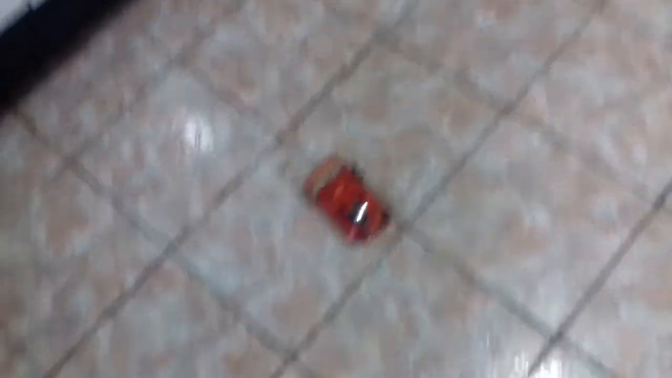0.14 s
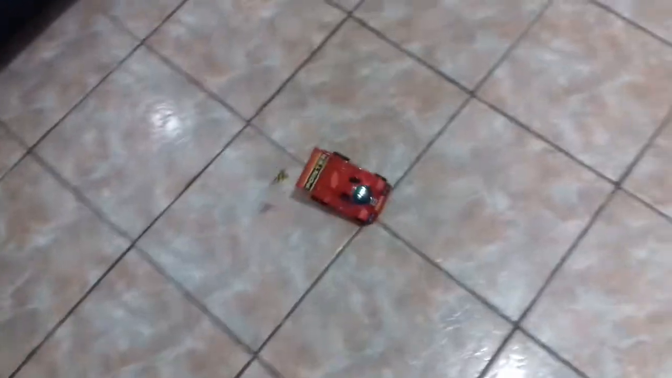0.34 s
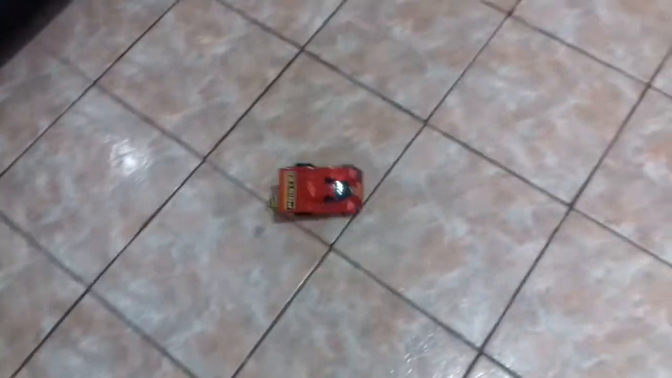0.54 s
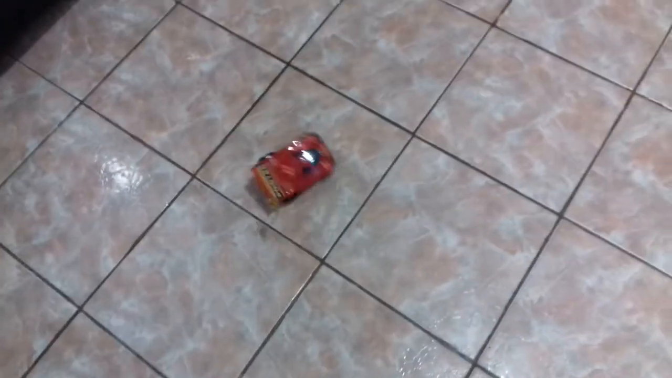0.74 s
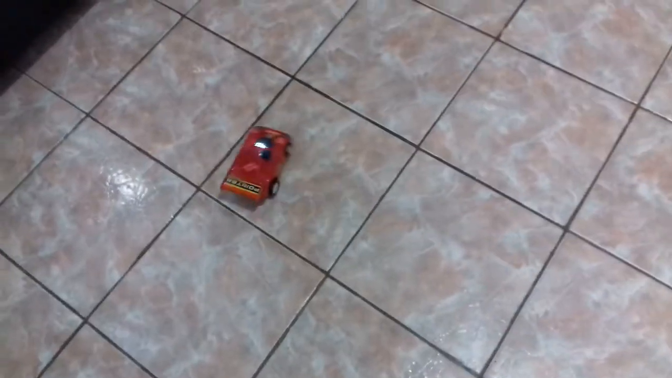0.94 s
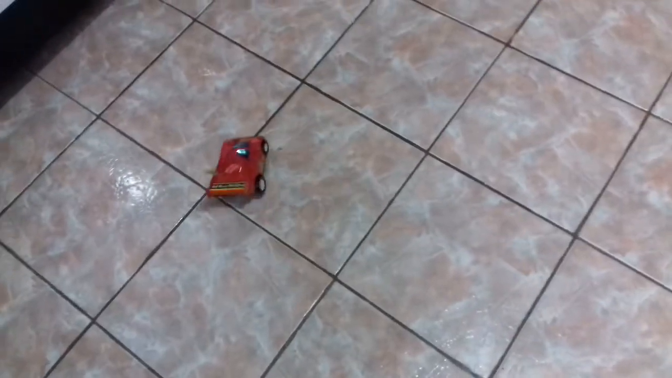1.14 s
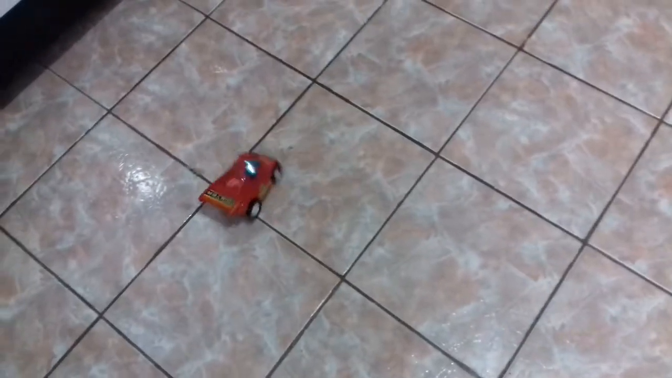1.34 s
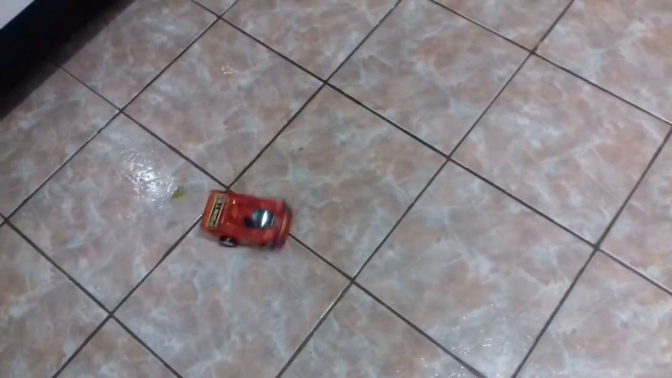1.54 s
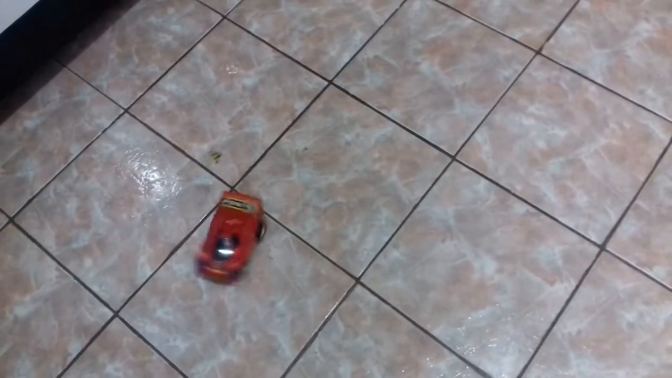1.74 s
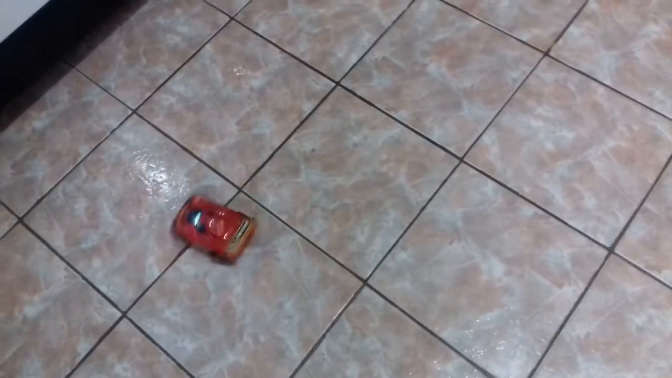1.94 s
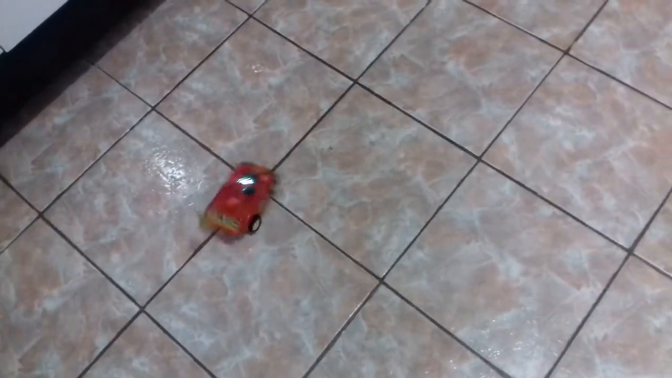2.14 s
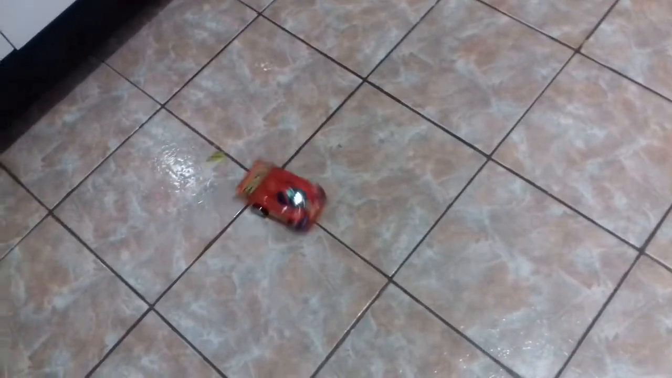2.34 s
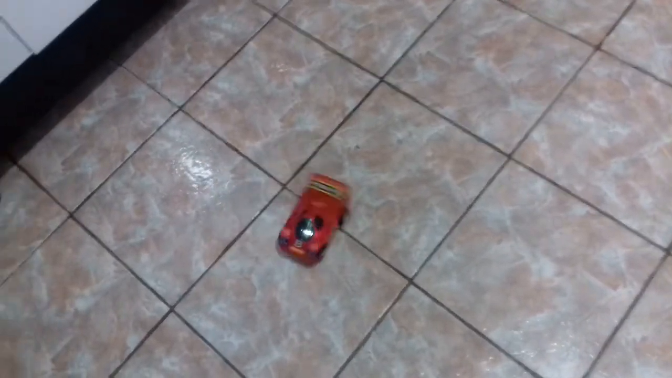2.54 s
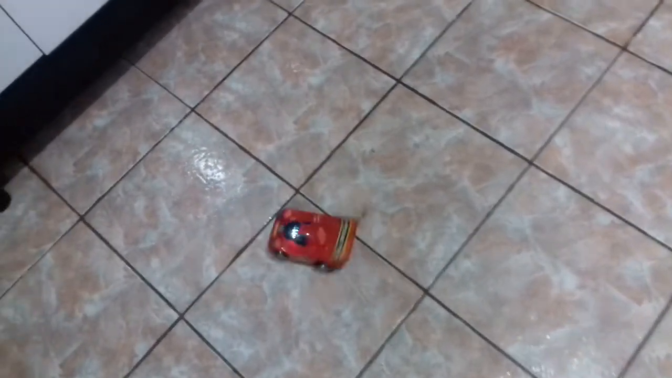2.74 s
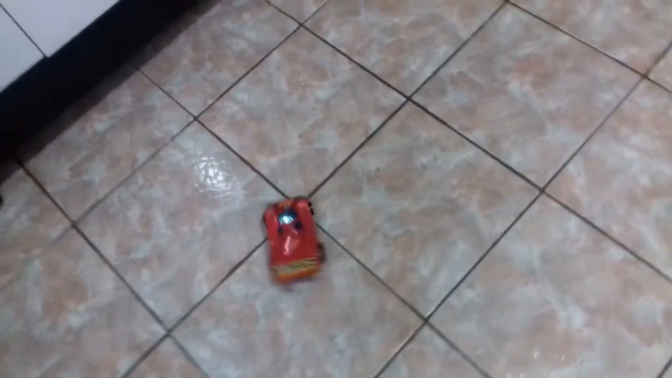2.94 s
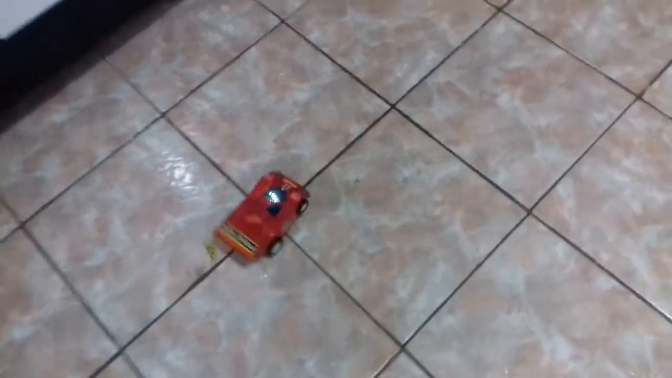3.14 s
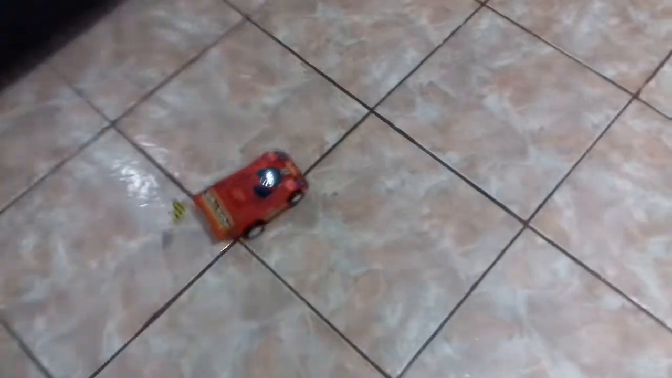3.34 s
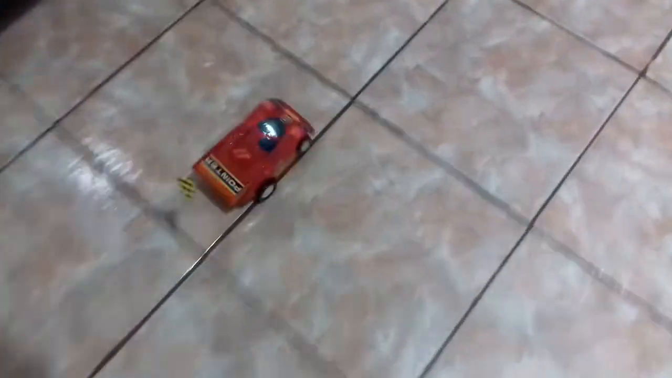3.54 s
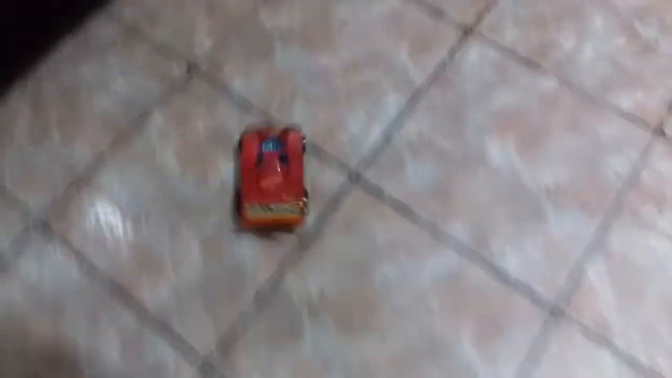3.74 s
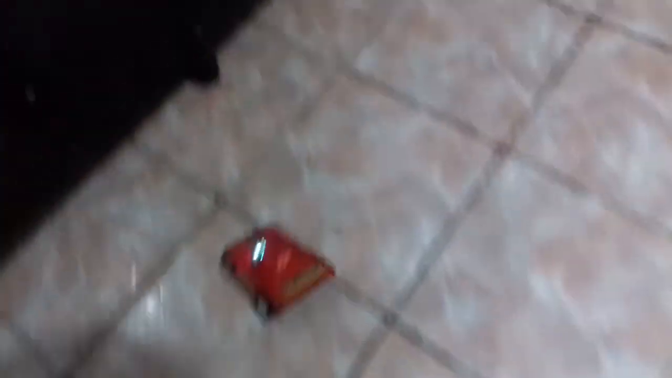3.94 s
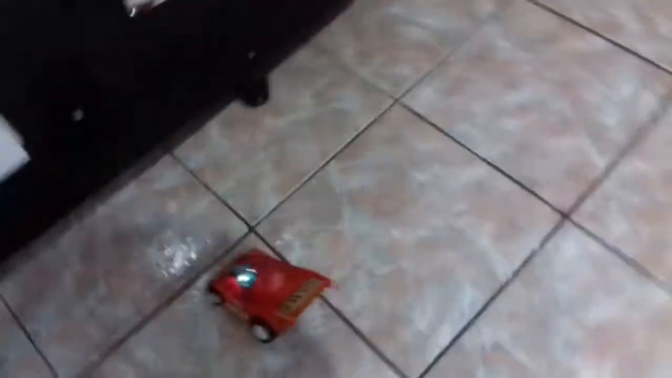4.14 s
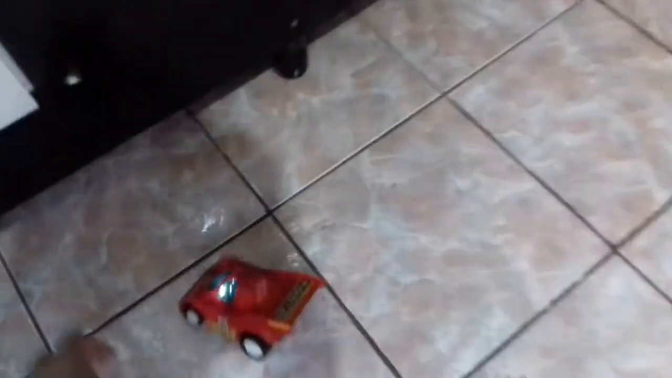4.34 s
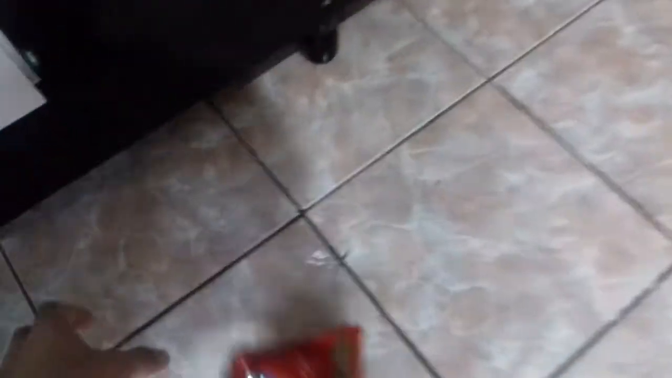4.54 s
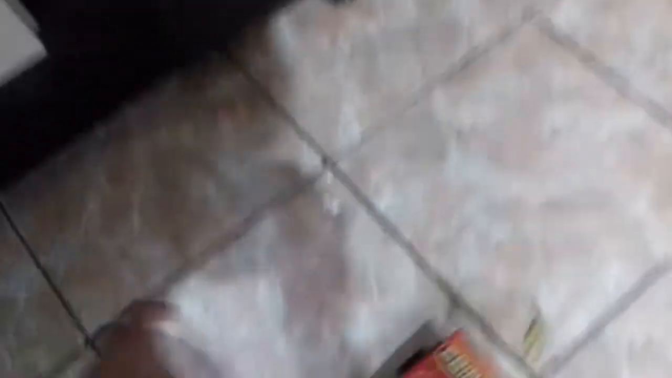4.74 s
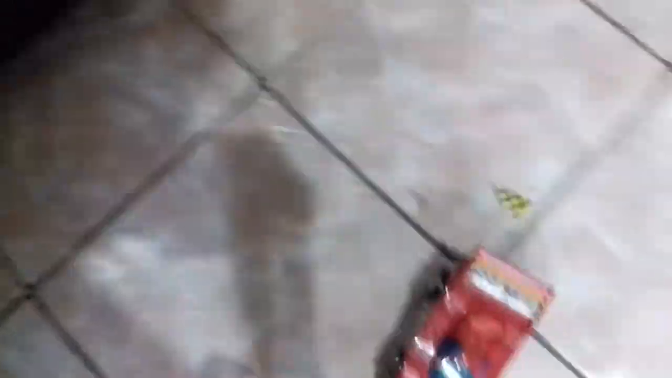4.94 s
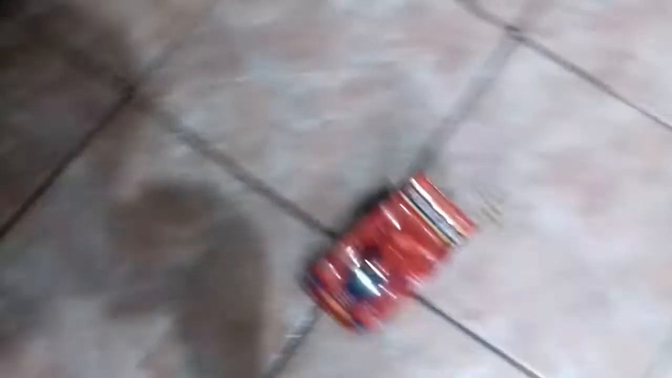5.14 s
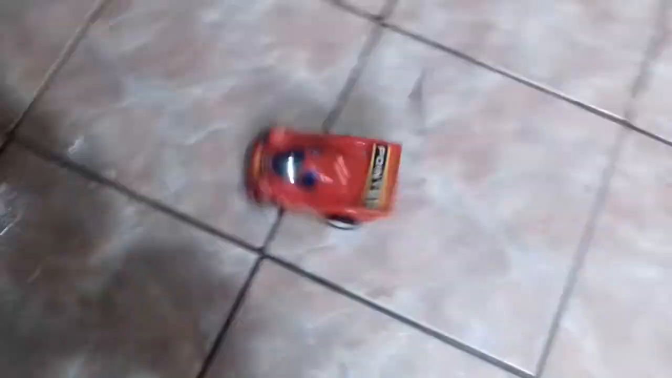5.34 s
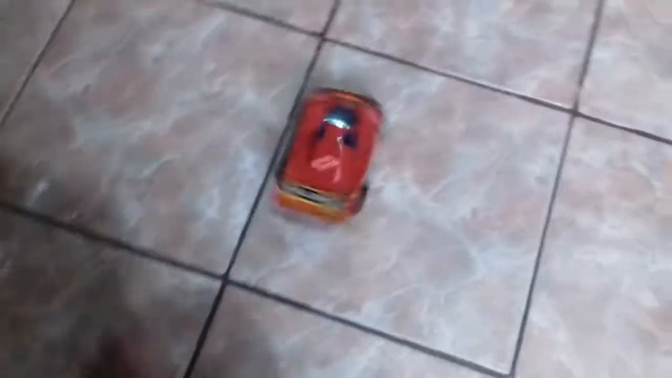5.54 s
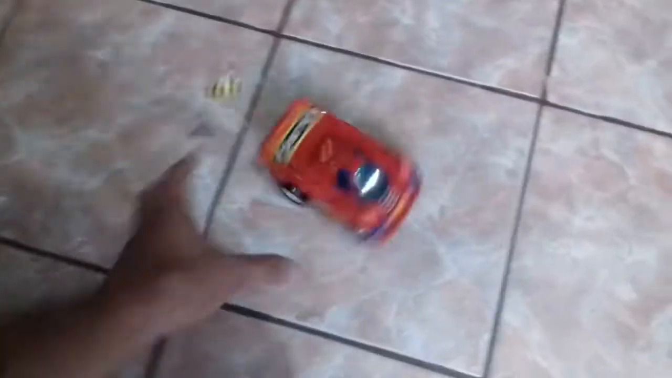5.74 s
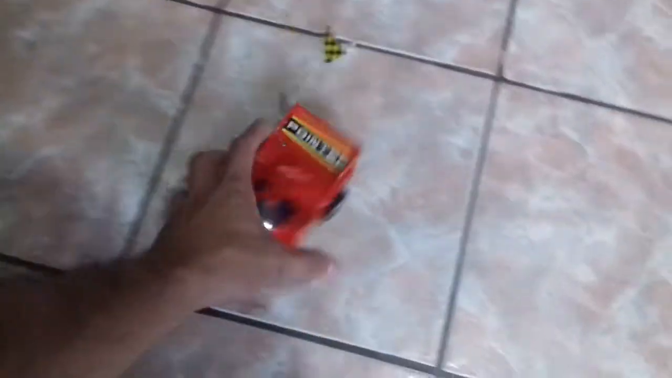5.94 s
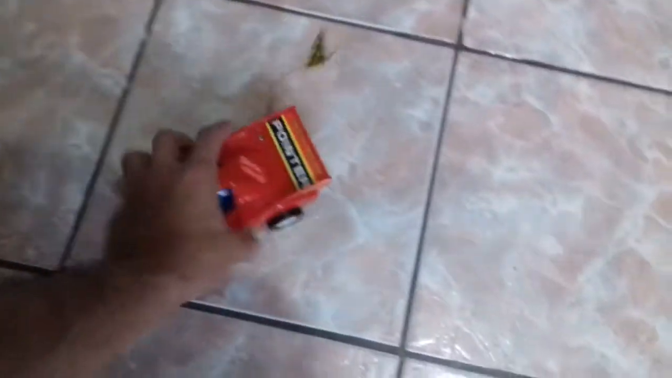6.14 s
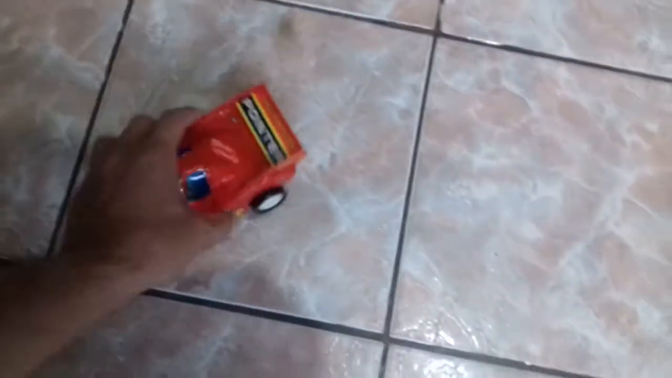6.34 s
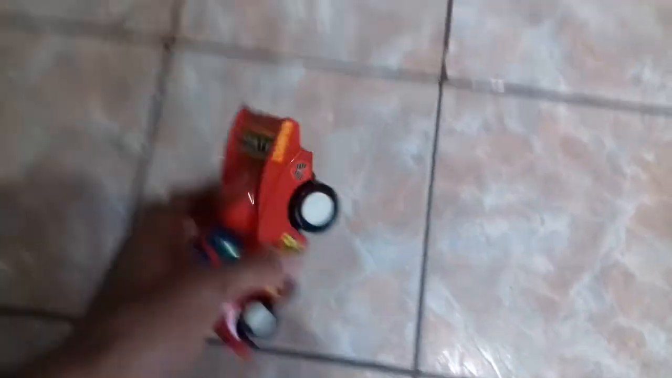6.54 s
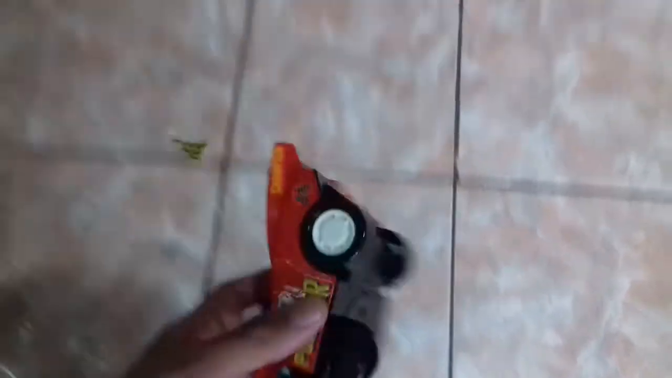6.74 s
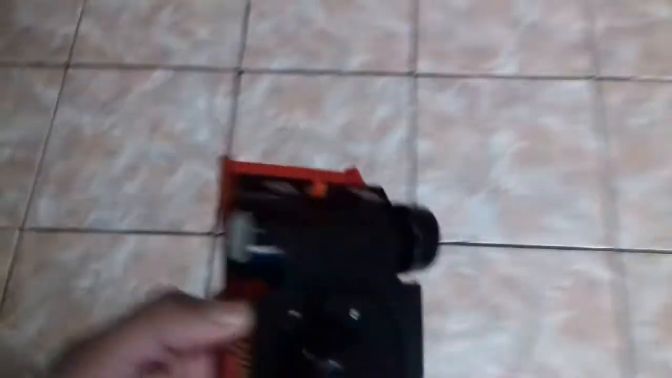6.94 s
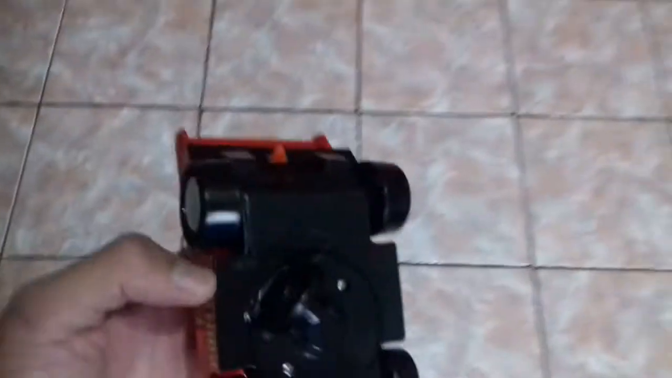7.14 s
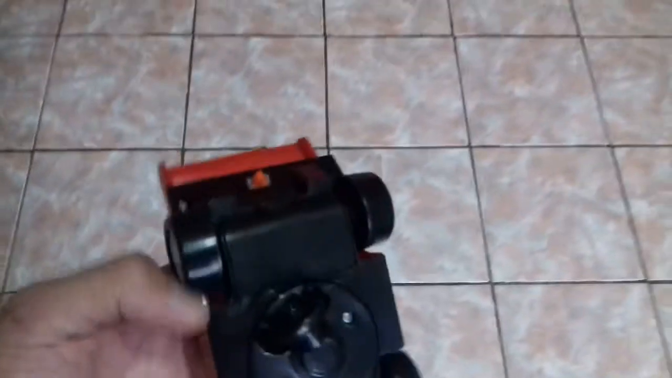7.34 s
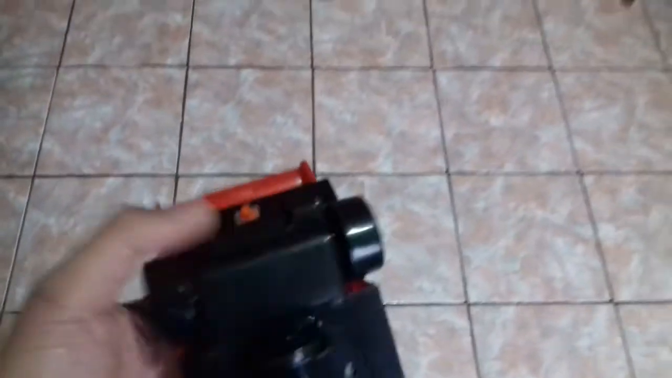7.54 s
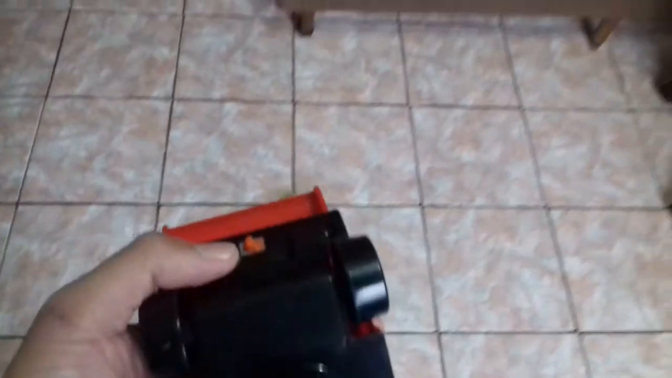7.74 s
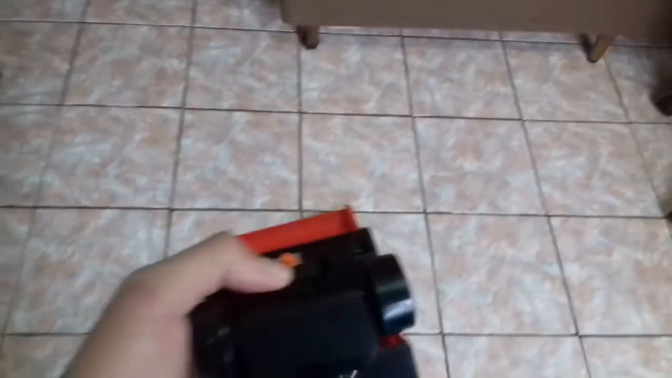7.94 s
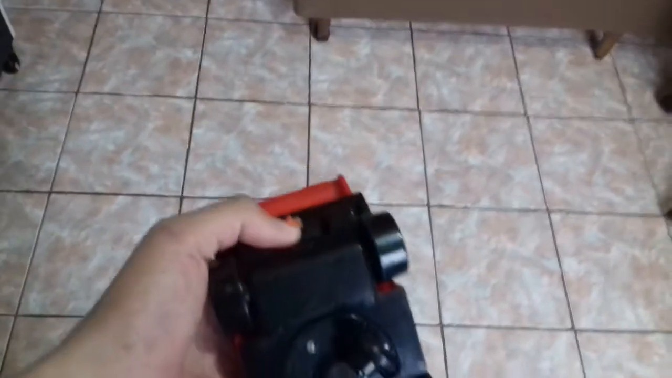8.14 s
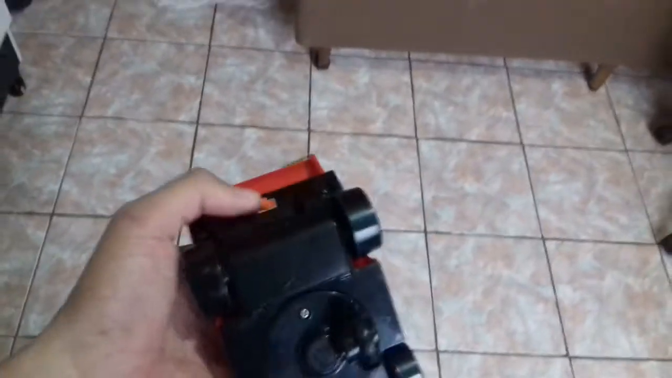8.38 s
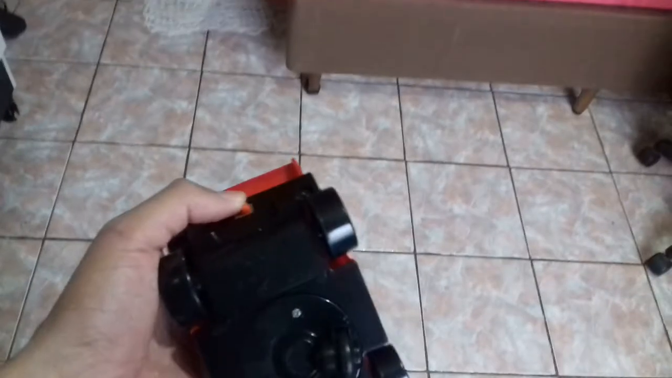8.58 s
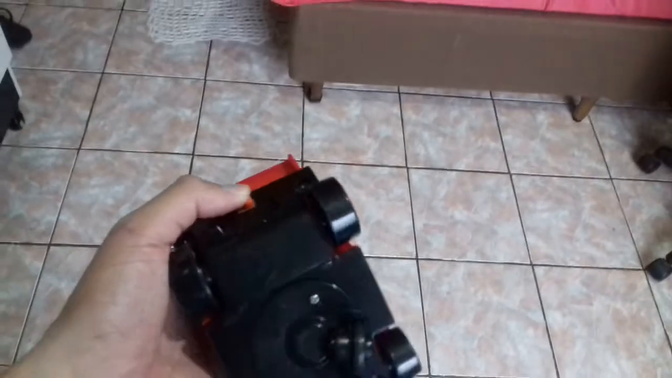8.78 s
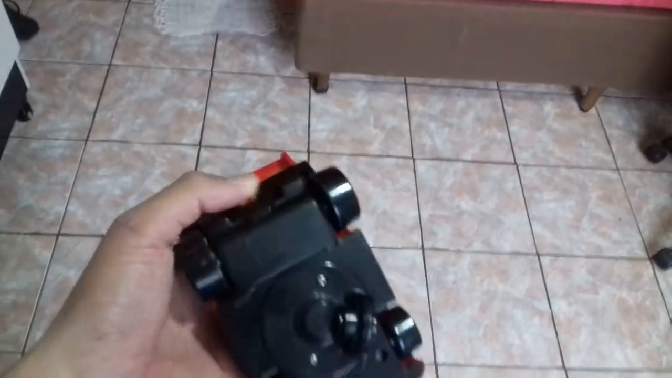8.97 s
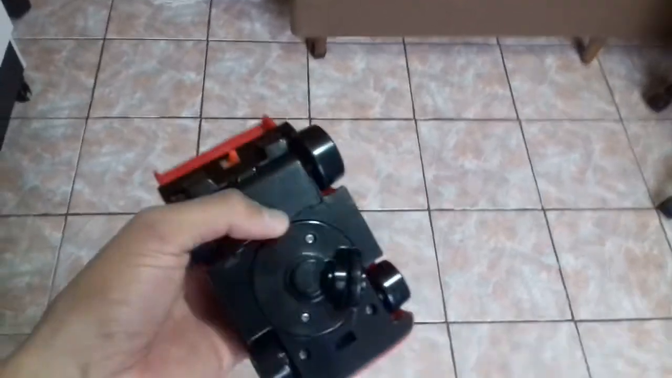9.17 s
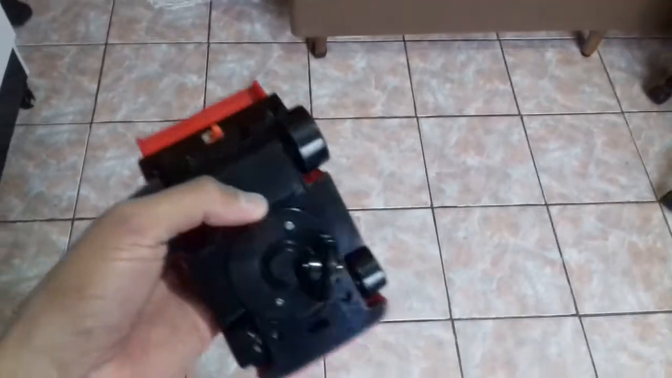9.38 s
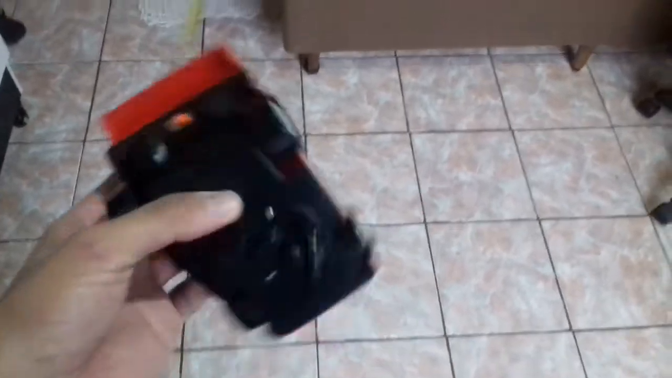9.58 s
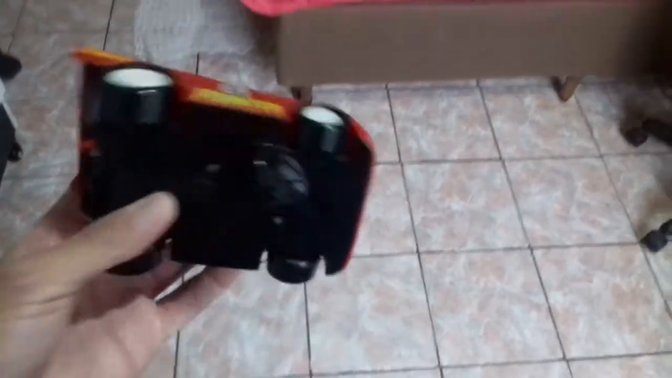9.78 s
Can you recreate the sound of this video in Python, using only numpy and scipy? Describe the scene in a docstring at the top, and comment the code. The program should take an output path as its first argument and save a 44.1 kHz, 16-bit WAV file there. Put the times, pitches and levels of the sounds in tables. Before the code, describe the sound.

Close handheld capture of a cheap battery toy car spinning on floor tiles: dense, bright, raspy gear noise with a thin whine, wavering as it turns, and irregular plastic rattles. Two hard knocks come around the middle. Picked up, it whirs steadily with a purer motor tone, then clicks off and winds down within half a second, leaving faint room hum and small handling clicks.

```python
"""In a quiet room with faint hums, a toy car spins over a tiled floor close by; a hand then lifts it.
Taps of its gear teeth ring through the plastic body, and tones at multiples of the shaft speed whine.
In the hand the shaft tone comes clear; switched off, the motor runs down.
Filtered noise makes the room air, the low thumps, the plastic's knocks and clicks, and a rustle.
Sparse echoes of the car come off hard tiles and walls."""
import sys
import numpy as np
from scipy import signal
from scipy.fft import rfft, irfft
from scipy.io import wavfile
from scipy.ndimage import uniform_filter1d, minimum_filter1d

SR = 44100
rng = np.random.default_rng(int(sys.argv[2]) if len(sys.argv) > 2 else 0)


def store_wav(level_fs):
    """Save 16-bit WAV to argv[1]."""
    pcm = np.round(np.clip(np.atleast_2d(level_fs), -1, 1) * 32767)
    wavfile.write(sys.argv[1], SR, pcm.T.astype(np.int16))


N = 432621  # length in samples

# The motor sags under load on the floor and runs free in the hand.
# Columns: time_s, shaft_speed_hz (turns per second), low_tones_db (before each tone's own level)
SHAFT = [(0, 204, -80.5), (.5, 198.4, -72), (.88, 195.3, -62), (.93, 213.7, -68), (1.149, 223.8, -70),
         (1.78, 214.7, -77), (1.9, 226.3, -72), (3.1, 220.2, -61), (3.8, 210, -64), (4.55, 192.5, -67),
         (4.77, 190.6, -58), (4.999, 222.6, -61.5), (6.3, 221, -68.5), (6.45, 242.4, -62),
         (6.78, 250, -51.5), (6.86, 250.8, -38), (7.1, 253.4, -39), (7.17, 249.9, -52.5), (7.7, 246, -50.5),
         (8.05, 247, -49), (8.6, 245, -51), (8.72, 238.3, -68), (9.1, 147, -88)]
# Wheels jolt over tile joints.
# Columns: start_s, treble_peak_db (sets the strength, up to a cap), thump_db
JOLTS = [(0.918, -10, -60), (0.986, -11.5, -56.5), (1.086, -23, -54), (1.5305, -22.5, -52),
         (1.5594, -11.5, -64), (1.6429, -28.5, -59), (2.0034, -11, -59), (2.0637, -14.5, -65),
         (2.2381, -7, -64), (2.52, -13.5, -65), (2.7524, -20, -45), (3.3021, -13.5, -56),
         (3.7725, -18.5, -62), (4.794, -7, -53), (4.857, -14.5, -53), (4.906, -8.5, -53),
         (4.9608, -12.5, -63), (5.0024, -19.5, -57), (5.2639, -7.5, -52), (5.3282, -19.5, -51),
         (5.917, -18.5, -64)]
# The plastic knocks on hard landings and clicks in the hand.
# Columns: start_s, peak_db (before echoes), main_pitch_hz, thump_db
CLICKS = [(0.919, -10, 3460, -47), (4.795, -2.5, 1820, -48), (5.329, -2, 1840, -62), (8.67, -12, 3782, -57),
          (9.104, -46, 3540, -53), (9.153, -46.5, 1960, -50), (9.303, -43, 3830, -56),
          (9.613, -33, 2510, -60), (9.636, -31.5, 1120, -71), (9.653, -32, 4250, -71),
          (9.712, -30, 2440, -66), (9.741, -40, 2010, -68), (9.764, -21.5, 4030, -68),
          (9.783, -42, 4080, -67), (9.798, -40, 4220, -64)]
# Ringing pitches of the plastic body. Columns: pitch_hz, width_hz (of one filter pass), level_db
PLASTIC = [(1105, 400, -3.5), (1800, 570, -1.5), (2400, 480, -5.5), (2870, 530, -2), (3700, 400, -6.5),
           (4080, 740, -3)]

USUAL_TURNS_HZ = 225.6  # usual shaft speed
LIFT_S, OFF_S, STILL_S = 6.38, 8.72, 9.21  # lifted, switched off, at rest


def gain_of(db):
    """Turn decibels into a plain multiplier."""
    return 10 ** (np.asarray(db) / 20)


def evened(x):
    """Scale a sound to an average strength (rms) of 1."""
    return x / np.sqrt(np.mean(x ** 2) + 1e-20)


def read(points, hz):
    """Read levels off a curve of pitch and dB, on a logarithmic pitch scale."""
    pitch_hz, level_db = np.transpose(points)
    return np.interp(np.log(hz + 1), np.log(pitch_hz + 1), level_db, left=-99, right=-99)


def add(mix, start_s, sound):
    """Mix a sound in at a given time, cutting it at the end of the scene."""
    part = mix[round(start_s * SR):][:len(sound)]
    part += sound[:len(part)]


def coloured(points):
    """Steady noise whose spectrum follows a curve, rms 1."""
    hz = np.fft.rfftfreq(N, 1 / SR)
    spectrum = rfft(rng.standard_normal(N))
    return evened(irfft(spectrum * gain_of(read(points, hz)), N))


def wander(shape, sizes):
    """Smooth random change of rms 1: noise averaged twice along each axis."""
    x = rng.standard_normal(shape)
    for axis, size in enumerate(sizes):
        x = uniform_filter1d(uniform_filter1d(x, size, axis), size, axis)
    return evened(x)


def ring(x, hz, width):
    """A fixed resonance: it passes its own pitch at gain 1 and weakens the rest."""
    return signal.lfilter(*signal.iirpeak(hz, hz / width, SR), x)


def by_place(pair, t):
    """Use the first value on the floor and the second in the hand, with a quick glide between."""
    return np.interp(t, [LIFT_S - .02, LIFT_S + .02], pair)


def run_down_db(t):
    """Fading of the motor after the switch: it coasts, then stops quickly."""
    share = np.clip((t - OFF_S) / (STILL_S - OFF_S), 0, 1)
    return 20 * 2.27 * np.log10(np.maximum(1 - share ** 1.45, 1e-4))


def jolt_strength(peak_db):
    """Strength of a jolt against the usual treble peaks of the whir, capped."""
    usual_peak_db = -13
    return min(gain_of(peak_db - usual_peak_db), 2.2)


def background():
    """Quiet room air as steady coloured noise, and faint hums that waver in level and phase."""
    # Spectrum of the air, before its overall level. Columns: pitch_hz, level_db (per Hz)
    air = [(15, -40), (25, -19), (45, -18), (75, -26), (152, -17), (227, -18), (305, -16), (421, -23),
           (1850, -28), (2230, -22), (3340, -31), (4040, -23), (5880, -45), (15500, -51)]
    # Hums. Columns: pitch_hz, level_db
    hum_tones = [(301.5, -68), (45, -82)]
    t = np.arange(N) / SR
    hum = np.zeros(N)
    for hz, db in hum_tones:
        level = gain_of(db + 2.5 * wander((N,), (3000,)))
        hum += level * np.sin(2 * np.pi * hz * t + .9 * wander((N,), (3500,)))
    return gain_of(-62.5) * coloured(air) + hum


def side_hiss():
    """Faint low noise, to be added on the left and subtracted on the right."""
    # Spectrum of the hiss, before its overall level. Columns: pitch_hz, level_db (per Hz)
    hiss = [(25, -7.5), (80, -3.5), (250, -14.5), (600, -23)]
    return gain_of(-87) * coloured(hiss)


def thump(db, rise_s):
    """A short low push of filtered noise that swells and dies; db is the level at its height."""
    u = np.arange(3000) / SR / rise_s
    band = signal.butter(2, [150, 560], "band", fs=SR, output="sos")
    low = signal.sosfilt(band, rng.standard_normal(2 * len(u)))[len(u):]  # skip the filter's start
    shape = u * np.exp(1 - u)
    return gain_of(db) * low * shape / np.sqrt((low ** 2 * shape ** 2).sum() / (shape ** 2).sum())


def thumps():
    """Low pushes under jolts and clicks, each at its height on the listed time."""
    out, rise_s = np.zeros(N), .007
    for start_s, *_, thump_db in JOLTS + CLICKS:
        add(out, start_s - rise_s, thump(thump_db, rise_s))
    return out


def knock(peak_db, main_hz):
    """A crack and a brief rattle ring the plastic, most near a main pitch."""
    t = np.arange(3000) / SR
    decay = np.exp(-t / 0.0022) + 0.055 * np.exp(-t / 0.014)  # crack, then rattle
    crack = rng.standard_normal(len(t)) * decay * (1 - np.exp(-t / 0.0008))
    body = .0007 * crack
    for k, (hz, width_hz, db) in enumerate(PLASTIC):
        near_db = 9.4 * np.exp(-((hz - main_hz) / 500) ** 2)
        rung = ring(ring(crack, hz, width_hz), hz, width_hz)
        body += (-1) ** k * gain_of(db + near_db) * rung
    return gain_of(peak_db) * body / abs(body).max()


def rustle(count):
    """Loose parts rustle: noise of uneven level rings the plastic."""
    grit = rng.standard_normal(count) * gain_of(3.0 * wander((count,), (200,)))
    body = sum(gain_of(db) * ring(ring(grit, hz, width_hz), hz, width_hz) for hz, width_hz, db in PLASTIC)
    return gain_of(-54) * evened(body)


def knocks():
    """Knocks and clicks of the plastic, and the rustle once the hand tips the still car."""
    out, turn_over_s = np.zeros(N), 9.612
    for start_s, peak_db, main_hz, _ in CLICKS:
        add(out, start_s, knock(peak_db, main_hz))
    add(out, turn_over_s, rustle(N - round(turn_over_s * SR)))
    return out


def shaft_turns():
    """Turns of the motor shaft so far: its speed, trembling slightly, summed over time."""
    time_s, speed_hz = np.transpose(SHAFT)[:2]
    speed = np.interp(np.arange(N) / SR, time_s, speed_hz)
    return np.cumsum(speed * (1 + 0.00253 * wander((N,), (700,)))) / SR


def whine(turns):
    """Tones at whole multiples of the shaft speed, each flickering in level."""
    # Low tones of the shaft. Columns: multiple, level_db (before the group's level)
    low_orders = [(1, -26), (2, -9), (3, 0), (4, -1), (5, 3), (6, -8)]
    # High tones of the shaft. Columns: multiple, level_db (before the group's level)
    high_orders = [(7, -12), (9, -5.5), (10, -5), (12, 4), (17, -0.5)]
    # Meshing of the pinion's eight teeth. Columns: multiple, level_db (before the group's level)
    mesh_orders = [(8, -12), (16, -3.5)]
    t, out = np.arange(N) / SR, np.zeros(N)
    time_s, speed_hz, low_tones_db = np.transpose(SHAFT)
    speed = np.interp(t, time_s, speed_hz)
    low_db = np.interp(t, time_s, low_tones_db)
    # loaded teeth sing louder: dB per Hz of sag while on the floor
    sag_hz = np.maximum(USUAL_TURNS_HZ - speed, 0) * (t < LIFT_S)
    high_db = by_place((-48, -43), t) + 0.345 * sag_hz
    mesh_db = by_place((-37, -29.5), t) + .5 * sag_hz
    groups = [(low_orders, low_db, .8), (high_orders, high_db, 3.0), (mesh_orders, mesh_db, 3.0)]
    for orders, level_db, flicker_db in groups:
        for k, db in orders:
            # a tone swells as it passes the ring of the axle near 1920 Hz
            lift_db = by_place((11, 4.5), t) / (1 + ((k * speed - 1920) / 110) ** 2)
            tone = np.sqrt(2) * np.sin(2 * np.pi * (k * turns + rng.random()))
            out += gain_of(level_db + db + lift_db + flicker_db * wander((N,), (900,))) * tone
    return out * gain_of(2 * run_down_db(t))


def random_taps(per_s, spread_db, most):
    """Taps at random times, of uneven size."""
    size = gain_of(spread_db * np.minimum(rng.exponential(1, N), most))
    return size * (rng.random(N) < per_s / SR)


def teeth(turns):
    """Dense taps of uneven gear teeth, pressed harder once a shaft turn, with backlash rattle and jolts."""
    taps = random_taps(9000, 1.09, 6) * rng.choice([-1., 1.], N)
    rattle = 0.23 * random_taps(70, 4.1, 4)
    rattle = signal.lfilter([1], [1, -np.exp(-1 / (0.0037 * SR))], rattle)  # each slack catch dies in a few ms
    jolts, lift, after = np.zeros(N), np.ones(N), np.arange(2000) / SR
    for start_s, peak_db, _ in JOLTS:
        strength = jolt_strength(peak_db)
        add(jolts, start_s, strength * (np.exp(-after / 0.0045) - np.exp(-after / 0.000486)))
        # the wheels hop, then land
        add(lift, start_s - .014, -np.clip(0.35 * strength, 0, .85) * np.hanning(round(.017 * SR)))
    pressure = 1 + 0.07 * np.cos(2 * np.pi * turns)
    return evened(taps * pressure * (abs(lift) + rattle + jolts))


def body_power(hz, t, body_db, axle_db, rasp_db, fizz_db):
    """How strongly the body's resonances pass each pitch over time, as the car turns and is lifted."""
    # Nominal ring widths of gearbox, chassis, shell, axle, cover. Column: width_hz
    widths_hz = [1350, 187, 300, 435, 600]
    # Spectrum of the rasp, before its overall level. Columns: pitch_hz, level_db (per Hz)
    rasp = [(4000, -3), (4800, 0), (5500, -4.5), (6500, -8.5), (7400, -19), (9000, -24.5)]
    # Spectrum of the fizz, before its overall level. Columns: pitch_hz, level_db (per Hz)
    fizz = [(6000, 3.5), (7500, 2.5), (9000, 0.5), (11000, 3.5), (13000, 1), (15500, -5.5)]
    # The cover ring sits lower once the grip shifts. Columns: time_s, pitch_hz
    cover_hz = [(6.3, 2437), (7.0, 2450), (7.7, 2492), (8.0, 2286)]
    # the gearbox ring rises with the shaft speed, until the switch
    speed = np.interp(np.minimum(t, OFF_S), *np.transpose(SHAFT)[:2])
    box_hz = 3650 + 6.9 * (speed - USUAL_TURNS_HZ)
    # shell, and the levels of chassis, shell and cover, drift by themselves as the car turns
    shell_drift, chassis_db, shell_db, cover_db = wander((4, len(t)), (1, 40))
    centres = [box_hz, 859, 1249 + 35 * shell_drift, 1868, np.interp(t, *np.transpose(cover_hz))]
    widths = [widths_hz[0] * by_place((1.0, 0.97), t), *widths_hz[1:]]
    shapes = [1 / (1 + (2 * (hz[:, None] - centre - 0 * t) / width) ** 2) ** 2.43
              for centre, width in zip(centres, widths)]
    shapes += [gain_of(2 * read(points, hz))[:, None] for points in (rasp, fizz)]
    # the chassis booms on after a jolt
    shaken = np.zeros(len(t))
    for start_s, peak_db, _ in JOLTS:
        shaken += jolt_strength(peak_db) * (t > start_s) * np.exp(-abs(t - start_s) / 0.13)
    boom_db = 4.5 * np.minimum(shaken, 2)
    # levels against the gearbox ring; pairs are dB on the floor and in the hand
    levels_db = [0,
                 by_place((-11.5, -10.5), t) + body_db + boom_db + chassis_db,
                 by_place((-1.5, -0.5), t) + body_db + shell_db,
                 by_place((0.5, -7), t) + axle_db,
                 by_place((-8.5, -6.5), t) + cover_db,
                 # the treble also fades faster in the run-down
                 by_place((5.5, 3.5), t) + rasp_db + .3 * run_down_db(t),
                 by_place((2.5, 2), t) + fizz_db + 0.87 * run_down_db(t)]
    return sum(shape / shape.mean(0) * gain_of(2 * db) for shape, db in zip(shapes, levels_db))


def gears(turns):
    """The taps ring through gearbox, chassis, shell, axle and cover, then through thin panels."""
    # The car spins on the floor, nearer and farther. Columns: time_s, gearbox_db (before the mix), then
    # against it and before each part's own level: low_body_db, axle_db, rasp_db, fizz_db
    on_floor = [(0.03, -19, -4, -6, -8.5, -14.5), (0.08, -15, -11, -6.5, -13, -17.5),
                (0.68, -15.5, -9.5, -7.5, -11.5, -15.5), (1.12, -16.5, -10.5, -8.5, -13.5, -18),
                (1.28, -16.5, -11.5, -5.5, -11.5, -15.5), (1.95, -16.5, -8.5, -7, -13.5, -19.5),
                (2.14, -16.5, -13, -8.5, -13, -18), (2.57, -17.5, -5.5, -4.5, -10, -16.5),
                (3.11, -17.5, -9.5, -5.5, -8.5, -19), (3.5, -19, -3.5, -5, -6, -15.5),
                (3.96, -16, -11, -5.5, -9.5, -16.5), (4.24, -18, -6, -0.5, -9.5, -14.5),
                (4.6, -16.5, -8.5, -6.5, -9.5, -15.5), (5.6, -17, -7, -6, -12.5, -19),
                (6.17, -16, -7, -7, -10.5, -17.5), (6.32, -15.5, -9.5, -9, -13, -16),
                (6.36, -19, -8.5, -15, -11, -21)]
    # The hand turns the car over. Columns: time_s, gearbox_db, low_body_db, axle_db, rasp_db, fizz_db
    in_hand = [(6.4, -21.5, -9.5, -4.5, -8, -19), (6.61, -22.5, -12.5, -5, -6.5, -17),
               (6.97, -19, -13, -13, -11, -20.5), (7.3, -19, -17.5, -13, -7.5, -18.5),
               (7.47, -18, -18.5, -13, -10.5, -20.5), (7.98, -19, -14.5, -8, -11, -19),
               (8.53, -19, -17.5, -14, -9.5, -21), (8.72, -21, -17, -2.5, -7.5, -16.5)]
    # Thin panels that ring on and off. Columns: pitch_hz, width_hz, level_db (against the whir there)
    panels = [(844, 49, -3), (1142, 130, -11), (1317, 18, -10.5), (1677, 30, -7.5), (1820, 30, -7),
              (1965, 21, -3), (2200, 100, -3), (2957, 240, -4.5), (3224, 52, -26), (3570, 25, -15),
              (3650, 78, -14), (3814, 28, -22), (3990, 97, -9), (4280, 99, -4.5)]
    frame, overlap = 512, 512 - 128  # samples
    hz, t, spectrum = signal.stft(teeth(turns), SR, nperseg=frame, noverlap=overlap)
    time_s, *columns = np.transpose(on_floor + in_hand)
    box_db, *part_levels_db = (np.interp(t, time_s, column) for column in columns)
    power = body_power(hz, t, *part_levels_db)
    # small patches of pitch and time flicker in level
    patches_db = 1.38 * wander(spectrum.shape, (2, 30)) + 0.46 * wander(spectrum.shape, (8, 8))
    shaped = spectrum * np.sqrt(power) * gain_of(box_db + run_down_db(t) + patches_db)
    whir = signal.istft(shaped, SR, nperseg=frame, noverlap=overlap)[1][:N]
    ringing = sum(gain_of(db + 0.57 * wander((N,), (3000,))) * ring(whir, pitch_hz, width_hz)
                  for pitch_hz, width_hz, db in panels)
    bass_cut = signal.butter(6, 520, "high", fs=SR, output="sos")  # the small body radiates no bass
    return signal.sosfilt(bass_cut, whir + ringing)


def room(x):
    """Sparse echoes of random sign off hard tiles and walls; three sets take turns as the car moves about."""
    fade_s = .27  # time to fall by 60 dB
    at, out, t = np.arange(150, SR // 2, 20), np.zeros(N), np.arange(N) / SR
    for k in range(3):
        echoes = np.zeros(SR // 2 + 20)
        sizes = rng.choice([-1., 1.], len(at)) * gain_of(-60 * at / SR / fade_s)
        echoes[at + rng.integers(0, 20, len(at))] = sizes
        echoes = signal.lfilter(*signal.butter(1, 5000 / SR * 2), echoes)  # soften the treble
        share = np.sqrt(2 / 3) * np.cos(np.pi * (1.7 * t + k / 3))
        out += signal.oaconvolve(x * share, echoes / np.linalg.norm(echoes))[:N]
    return out


def scene():
    """Mix the car, its echoes and the quiet room into left and right."""
    turns = shaft_turns()
    car = gain_of(-3.5) * gears(turns) + knocks()
    echoes = gain_of(-7) * room(car)
    mid = car + echoes + thumps() + whine(turns) + background()
    side = side_hiss()
    return np.array([mid + side, mid - side])


def record(dry):
    """A limiter eases the gain down around the highest peaks; then the top treble is cut."""
    ceiling, edge_hz = .97, 15750
    room_left = np.minimum(ceiling / (abs(dry).max(0) + 1e-9), 1)
    held = minimum_filter1d(room_left, size=400)
    gain = uniform_filter1d(uniform_filter1d(held, size=200), size=200)
    treble_cut = signal.firwin(511, edge_hz, window=("kaiser", 9), fs=SR)
    return signal.oaconvolve(dry * gain, treble_cut[None], "same")


dry = scene()
out = record(dry)
store_wav(out)
```